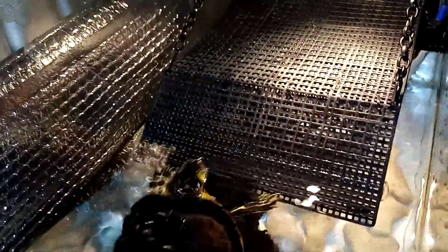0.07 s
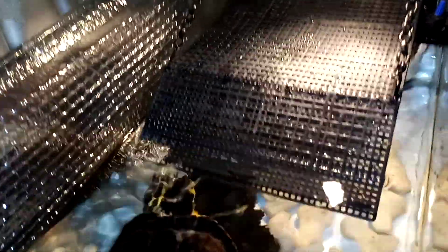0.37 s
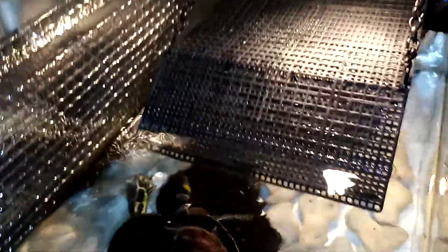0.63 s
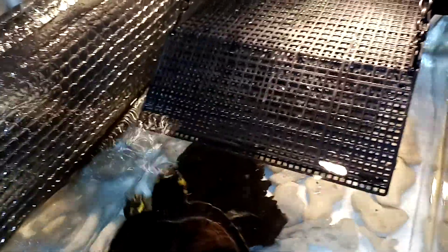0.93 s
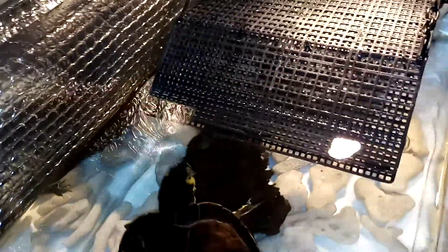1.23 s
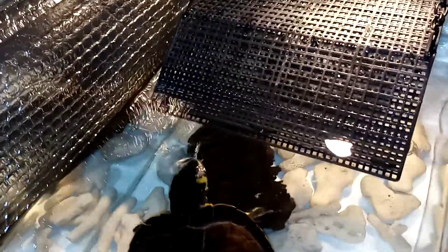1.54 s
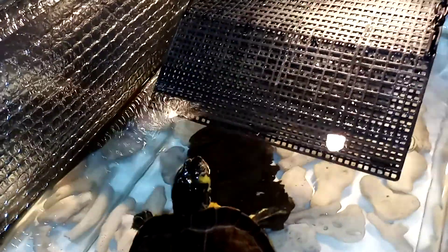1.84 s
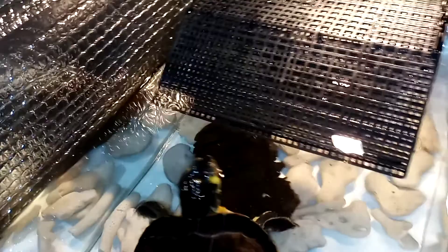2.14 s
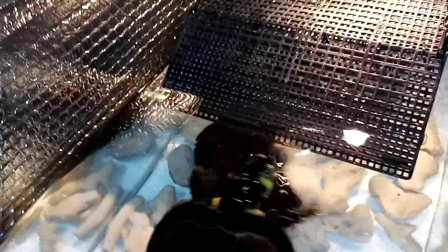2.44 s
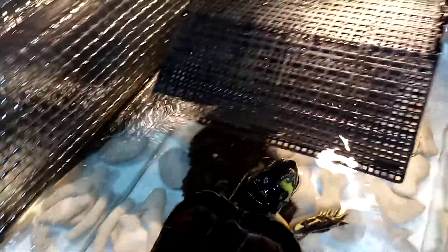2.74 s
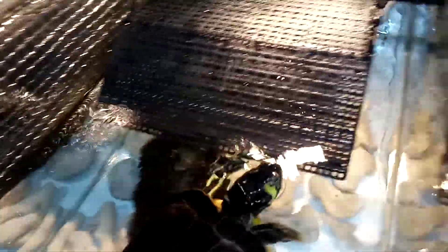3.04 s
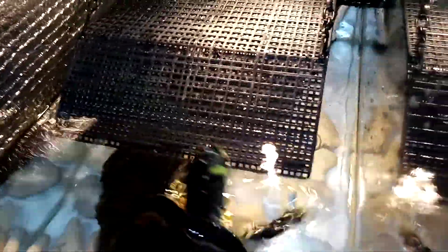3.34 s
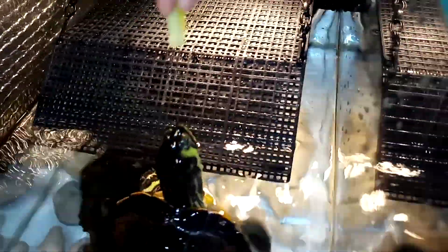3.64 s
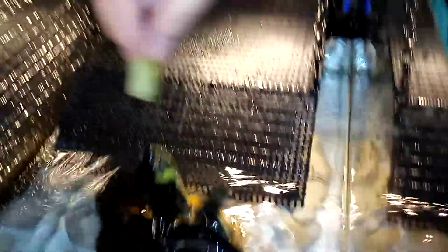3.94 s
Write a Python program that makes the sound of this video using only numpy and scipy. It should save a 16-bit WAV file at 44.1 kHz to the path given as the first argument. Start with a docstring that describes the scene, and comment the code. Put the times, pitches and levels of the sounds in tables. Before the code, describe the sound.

A steady fizzing trickle from a tank filter, with close clicks and small splashes.

```python
"""A filter's outflow trickles steadily into a small glass turtle tank, miked from just above the water.
The stream is a dense fizz of ringing bubbles coloured by the tank, brighter as the microphone shifts.
Sharp plastic clicks sound close by, mostly early on. Soft low bumps and gurgles lie underneath;
later come small splashes and a fine spray as the turtle paddles."""
import sys
import numpy as np
from scipy import signal
from scipy.fft import rfft, irfft
from scipy.io import wavfile

SR = 44100
rng = np.random.default_rng(int(sys.argv[2]) if len(sys.argv) > 2 else 0)


def dump(signal):
    """Clip the signal to [-1, 1] and save it as 16-bit WAV at the path in sys.argv[1]."""
    limited = np.clip(np.atleast_2d(signal).T, -1, 1)
    pcm = np.round(limited * 32767).astype(np.int16)
    wavfile.write(sys.argv[1], SR, pcm)


N = 176400

# soft knocks and glugs in the tank: (time [s], level [dB], pitch [Hz])
LOW_BUMPS = [(.203, -38.5, 259), (.555, -48.5, 192), (1.328, -38.5, 170), (1.331, -30.5, 700),
             (1.366, -36, 345), (1.725, -47, 171), (1.816, -29.5, 506), (2.133, -27.5, 445),
             (2.696, -31, 350), (2.715, -35, 480), (2.955, -29, 675), (3.14, -42, 233), (3.786, -31, 654)]
# small splashes at the surface: (time [s], level [dB], pitch [Hz], t60 [s], half width [share of pitch])
SURFACE_SPLASHES = [(1.401, -54, 11100, .06, .12), (1.903, -59, 13000, .1, .22),
                    (2.085, -58, 12000, .04, .22), (2.146, -51, 10600, .04, .15),
                    (2.48, -59, 12500, .1, .22), (2.562, -52, 11000, .04, 0.17), (2.69, -68, 14000, .1, .2),
                    (2.861, -29, 4000, 0.07, 0.34), (2.878, -31, 4500, .025, .25),
                    (2.878, -50, 10000, .025, .17), (2.945, -65, 14000, .1, .2),
                    (3.039, -32.5, 4270, 0.086, 0.35), (3.216, -27, 4900, .02, 0.2),
                    (3.216, -43, 10200, 0.021, .24), (3.318, -41, 10800, 0.04, 0.11),
                    (3.586, -42, 10600, .06, .13), (3.588, -55, 13000, .11, .22),
                    (3.716, -47, 9640, .036, .08), (3.782, -29.5, 2800, 0.05, .42)]
# hard contacts on plastic: (time [s], level [dB], crack offset [dB], roll-off [Hz], ring tilt [dB/octave])
CONTACTS = [(.0713, -12, -23, 4000, 7), (0.074, -21, -13, 4000, 12), (0.08, -17, -15, 4000, 12),
            (.0882, -14, -10, 3600, 5), (0.1198, -20.5, 1.5, 10500, 9), (0.1312, -12.5, -3.5, 9800, 2),
            (.1646, -21, -9, 10000, 6), (0.1765, -15.5, 1.5, 11100, 21), (0.1867, -21, -9, 10000, 9),
            (0.4682, -16.5, 3.5, 8200, 7), (0.4707, -12.5, -8, 7500, -4), (0.4734, -18.5, 3, 8550, 6),
            (.5080, -17.5, -0.5, 7000, 2), (0.5098, -19, -5, 5500, -6), (0.514, -22, -6, 4500, 6),
            (0.5183, -21.5, -4, 4500, -2), (0.528, -23, -3, 5500, -4), (2.428, -24, -2, 3480, -13),
            (3.781, -24, -4, 4900, 6), (3.785, -18, -5, 3500, -3), (3.8066, -21, -12, 3800, 5)]
# modes of the plastic: (frequency [Hz], relative level [dB], t60 [s])
PLASTIC_MODES = [(1840, -13.5, 0.039), (2610, -12, 0.02), (2690, -2.5, 0.015), (3094, -1.5, 0.026),
                 (3336, -4.5, 0.031), (3744, -3.5, 0.025), (4085, -12, 0.02), (4500, -12, 0.014),
                 (4910, -23, .014)]
# spectrum of a contact's crack: (frequency [Hz], relative level [dB])
CRACK_SPECTRUM = [(100, -48), (450, -17), (1300, -4.5), (1800, -5), (2900, 5), (4800, -1.5), (6000, -15.5),
                  (8000, -18), (10300, -17), (11800, -26), (15000, -42)]
# pinging of small bubbles where the stream lands: (time [s], level [dB])
PING_LEVELS = [(0, -55), (.55, -43.5), (1.1, -42.5), (1.7, -49), (2.1, -46), (2.7, -46.5), (3.2, -50),
               (4.0, -59)]
# the stream from just above the water: (frequency [Hz], relative level [dB])
STREAM_SPECTRUM = [(25, -36), (50, -49), (75, -37), (110, -23), (160, -14.5), (220, -6), (330, 0.5),
                   (560, 3), (800, 0.5), (1150, -1.5), (2000, 5), (2800, 5), (3800, 5.5), (4500, -3),
                   (5500, -14), (6700, -23.5), (8500, -23.5), (10700, -26), (12200, -43.5), (15500, -42)]
# resonances of the tank: (frequency [Hz], width [Hz], lift [dB])
TANK_RESONANCES = [(367, 20, 2), (576, 42, 3.5), (750, 24, 2), (955, 53, 5), (1066, 47, 5.5), (1258, 97, 6),
                   (1439, 58, 7.5), (1616, 43, 3.5), (1874, 23, 5), (2610, 125, 3.5), (2730, 110, 1.5),
                   (2940, 73, 3.5), (3270, 98, 2.5)]
# drift of four stream bands, each about its own mean: (time [s], body [dB], ring [dB], treble [dB], top [dB])
BAND_LEVELS = [(0.0, -41, -39.5, -49, -64), (0.34, -40.5, -41, -49, -64.5), (0.53, -40, -41.5, -53, -65.5),
               (0.87, -39.5, -45, -53, -66), (1.17, -39.5, -41, -50.5, -65.5),
               (1.38, -40, -40.5, -49.5, -63.5), (1.76, -40, -40, -48.5, -65), (2.08, -39, -38.5, -48, -63),
               (2.32, -39.5, -42, -45.5, -59.5), (2.8, -39, -40.5, -46, -63), (3.19, -40, -44, -44, -58),
               (3.55, -40.5, -44.5, -44, -58.5), (3.75, -39, -44, -43.5, -60.5),
               (4.0, -40.5, -44.5, -47, -62.5)]
# where those four bands lie: (frequency [Hz])
BAND_CENTRES = [1840, 2930, 4450, 8200]

LOW_CUT_HZ = 57


def from_db(db):
    """Decibels to gain."""
    return 10 ** (np.asarray(db) / 20)


def unit_rms(x):
    """Scale to rms 1."""
    return x / np.sqrt(np.mean(x ** 2) + 1e-20)


def at_hz(points, hz):
    """Read (frequency, value) points on a log-frequency axis."""
    f, value = np.transpose(points)
    return np.interp(np.log(hz + 1), np.log(f), value)


def colour(x, gain):
    """Filter by a gain given as a function of frequency."""
    return irfft(rfft(x) * gain(np.fft.rfftfreq(len(x), 1 / SR)), len(x))


def butter(x, order, hz, kind):
    """Butterworth filter."""
    return signal.sosfilt(signal.butter(order, hz, kind, fs=SR, output="sos"), x)


def add(out, start, sound):
    """Mix a sound in at a start time in seconds."""
    i = max(int(start * SR), 0)
    out[i:i + len(sound)] += sound[:max(N - i, 0)]


def ring(kicks, hz, t60):
    """A resonator: each unit kick starts a decaying sine of height 1."""
    radius, angle = from_db(-60 / (t60 * SR)), 2 * np.pi * hz / SR
    return signal.lfilter([0, np.sin(angle)], [1, -2 * radius * np.cos(angle), radius ** 2], kicks + 1e-18)


def burst(gain, t60, attack_s, grain_db=0, size=8192):
    """Coloured noise, smooth or grainy, that rises and dies away."""
    t = np.arange(size) / SR
    envelope = from_db(-60 * t / t60) * (1 - np.exp(-t / attack_s))
    noise, grain = rng.standard_normal((2, size))
    shaped = noise * from_db(grain_db * grain) * envelope
    coloured = colour(np.pad(shaped, (16, size)), gain)[:size]
    return coloured * np.linalg.norm(envelope) / np.linalg.norm(coloured)


def glass_walls(direct, level_db, t60, attack_s):
    """The direct sound plus quick reflections off the nearby glass."""
    walls = burst(np.ones_like, t60, attack_s)
    reflected = signal.fftconvolve(direct, walls / np.linalg.norm(walls))[:len(direct)]
    return direct + from_db(level_db) * reflected


def bubble(hz, t60, rise, attack_s=0.0013):
    """One bubble rings and dies away, its pitch climbing by the share `rise`."""
    t = np.arange(int(t60 * SR)) / SR
    envelope = from_db(-60 * t / t60) * (1 - np.exp(-(t / attack_s) ** 2))
    return envelope * np.sin(2 * np.pi * hz * t * (1 + .5 * rise * t / t60))


def bumps(half_width_octaves=0.51):
    """Soft pushes into a heavily damped wall, each a dull knock with its reflections."""
    out = np.zeros(N)
    ratio = 2 ** half_width_octaves
    for start, db, hz in LOW_BUMPS:
        push = butter(signal.unit_impulse(4096), 2, [hz / ratio, hz * ratio], "band")
        knock = glass_walls(push / np.abs(push).max(), level_db=-5.5, t60=0.024, attack_s=0.0016)
        add(out, start, from_db(db) * knock)
    return out


def gurgles(per_s=12, low_hz=287, high_hz=976, cycles=29):
    """Larger bubbles ring low in the tank at random moments."""
    out = np.zeros(N)
    start = 0
    for wait, pitch, strength in rng.random((120, 3)):
        start += -np.log(1 - wait) / per_s
        hz = low_hz * (high_hz / low_hz) ** pitch
        gain = from_db(-44.25 + strength) * np.sqrt(2 * hz / high_hz)
        add(out, start, gain * bubble(hz, cycles / hz, rise=0.15))
    return out


def droplets(pitch, t60, width):
    """A scatter of droplets: a grainy hiss centred on one pitch."""
    def peak(hz):
        return 1 / (1 + ((hz / pitch - 1) / width) ** 2) ** 2
    return burst(peak, t60, attack_s=0.0021, grain_db=5, size=4088)


def splashes(spray_count=130, spray_from_s=2.2, spray_to_s=3.6, spray_hz=10200, spray_width=0.18):
    """Small splashes just below the microphone, and fine spray while the turtle paddles."""
    out = np.zeros(N)
    spray = rng.uniform([spray_from_s, -66, -1], [spray_to_s, -62, 1], (spray_count, 3))
    for start, db, pitch, t60, width in SURFACE_SPLASHES:
        add(out, start, from_db(db) * droplets(pitch, t60, width))
    for start, db, detune in spray:
        pitch = spray_hz * (1 + spray_width * detune)
        add(out, start, from_db(db) * droplets(pitch, t60=0.093, width=spray_width))
    return out


def plastic_clicks(tilt_pivot_hz=3200, contact_hz=5800):
    """Each contact cracks and rings the plastic; the glass throws it straight back."""
    def roll_off(hz, corner):
        return 1 / np.hypot(1, (hz / corner) ** 6)
    starts, db, crack_db, top_hz, tilt = np.transpose(CONTACTS)
    modes = np.zeros(N)
    for k, (hz, mode_db, t60) in enumerate(PLASTIC_MODES):
        kick_db = db + mode_db + tilt * np.log2(hz / tilt_pivot_hz) - 6.5
        kicks = np.zeros(N)
        kicks[(starts * SR).astype(int)] = from_db(kick_db) * roll_off(hz, top_hz)
        modes += (-1) ** k * ring(kicks, hz, t60)  # neighbouring modes start in opposite directions
    clicks = butter(modes, 4, contact_hz, "low")
    for start, level_db, corner in zip(starts, db + crack_db - 5, top_hz):
        crack = burst(lambda hz: from_db(at_hz(CRACK_SPECTRUM, hz)) * roll_off(hz, corner),
                      t60=0.016, attack_s=0.0002)
        add(clicks, start, from_db(level_db) * crack)
    in_tank = glass_walls(clicks, level_db=-7.5, t60=0.095, attack_s=0.0008)
    return butter(in_tank, 2, 2 * LOW_CUT_HZ, "high")


def bubble_pings(per_s=220, centre_hz=2736, spread_hz=157, spread_db=2.5):
    """Like-sized bubbles keep forming where the stream lands, and ping near one pitch."""
    pings = np.zeros(N)
    starts = np.flatnonzero(rng.random(N) < per_s / SR) / SR
    for start, (detune, strength) in zip(starts, rng.standard_normal((4096, 2))):
        ping = bubble(centre_hz + spread_hz * detune, t60=0.034, rise=0.024)
        add(pings, start, from_db(spread_db * min(strength, 1.5)) * ping)
    level_db = np.interp(np.arange(N) / SR, *np.transpose(PING_LEVELS))
    return from_db(level_db) * unit_rms(pings)


def fizz(per_s=6500, cycles=45, spread_db=0.9):
    """Bubbles of all sizes ring briefly at random, small ones more often; even in spectrum, rms 1."""
    out = np.zeros(N)
    pitches = np.geomspace(120, 16000, 72)
    shares = np.sqrt(pitches) / np.sqrt(pitches).sum()
    for hz, share in zip(pitches, shares):
        births = np.flatnonzero(rng.random(N) < per_s * share / SR)
        strength, polarity = rng.random((4096, 2))[:len(births)].T
        kick_db = spread_db * np.minimum(-np.log(1 - strength), 5)
        kicks = np.zeros(N)
        kicks[births] = np.sign(polarity - .5) * from_db(kick_db)
        ringing = np.diff(ring(kicks, hz, cycles / hz), prepend=0)
        out += np.sqrt(hz) * unit_rms(ringing)
    return unit_rms(out)


def stream(level_db=-35.5, wash_db=2.5):
    """The outflow up close: fizz and a smooth wash in the tank, brighter as the microphone shifts."""
    def tank(hz):
        lift_db = sum(db / (1 + (2 * (hz - f) / width) ** 2) for f, width, db in TANK_RESONANCES)
        return from_db(at_hz(STREAM_SPECTRUM, hz) + lift_db)
    water = fizz() + from_db(wash_db) * rng.standard_normal(N)
    in_tank = from_db(level_db) * unit_rms(colour(water, tank))
    times, *band_levels = np.transpose(BAND_LEVELS)
    out = np.zeros(N)
    for levels, weights in zip(band_levels, np.eye(len(band_levels))):
        band_shape = list(zip(BAND_CENTRES, weights))  # crossfades into the neighbouring bands
        band = colour(in_tank, lambda hz: at_hz(band_shape, hz))
        db = np.interp(np.arange(N) / SR, times, levels)
        out += from_db(db - db.mean()) * band
    return out


def scene():
    """The whole tank at one microphone, just above the water."""
    trickle = stream() + bubble_pings()
    clicks = plastic_clicks()
    low_sounds = butter(bumps() + gurgles(), 4, [LOW_CUT_HZ, 1500], "band")
    return (trickle + clicks + low_sounds + splashes())[None]


def record(dry):
    """The mono track, cut steeply above 15.8 kHz."""
    return signal.sosfilt(signal.ellip(12, .1, 80, 15800, fs=SR, output="sos"), dry)


dry = scene()
out = record(dry)
dump(out)
```